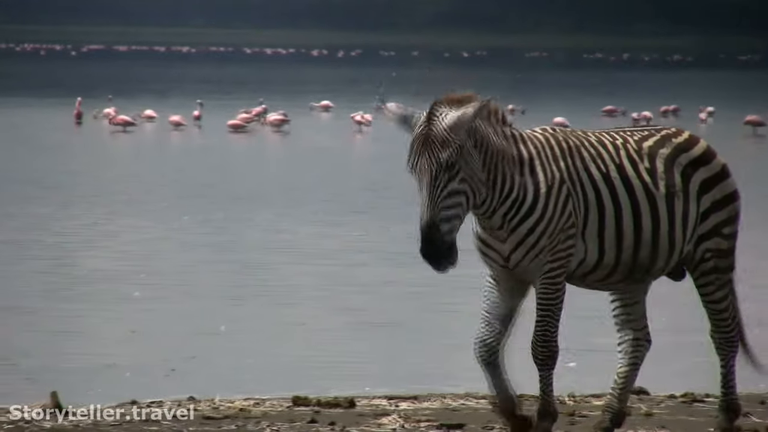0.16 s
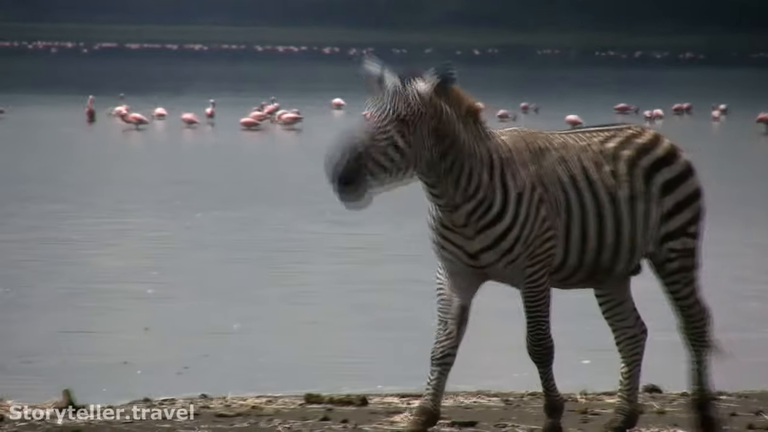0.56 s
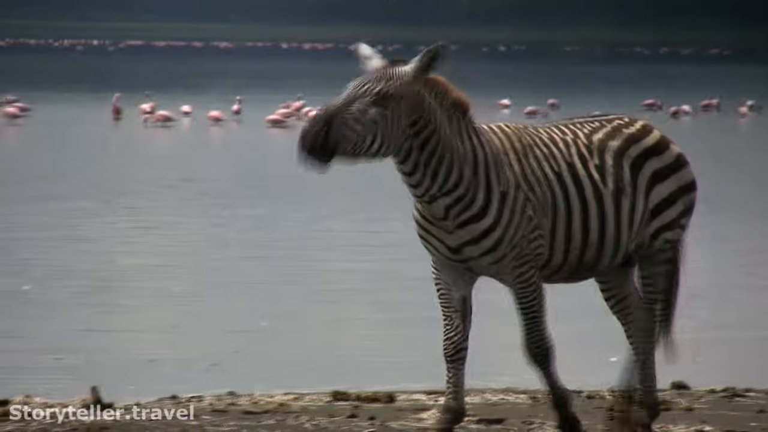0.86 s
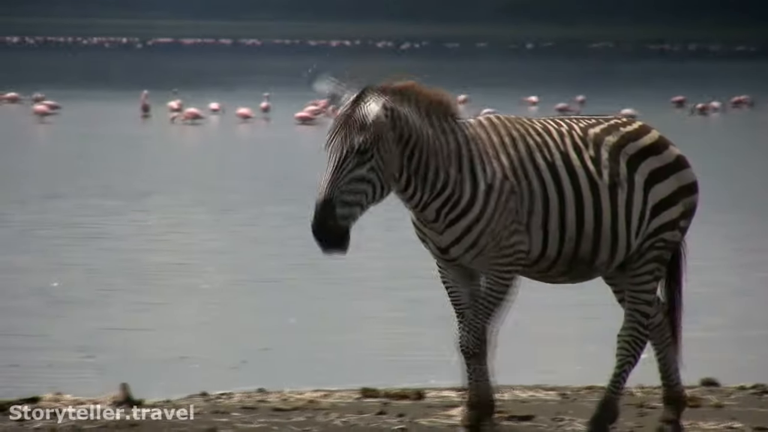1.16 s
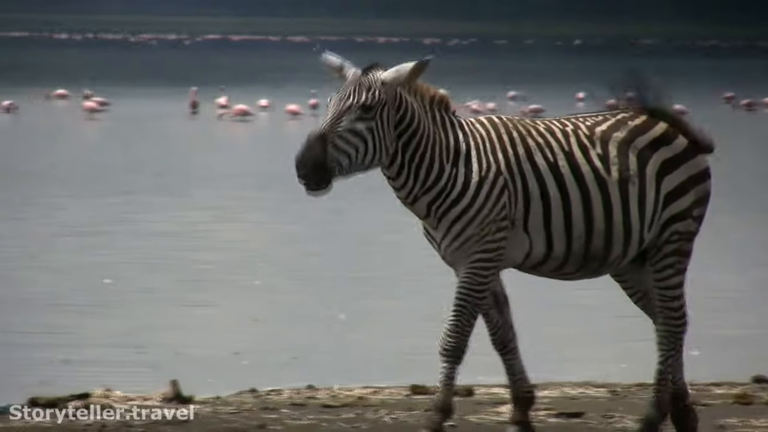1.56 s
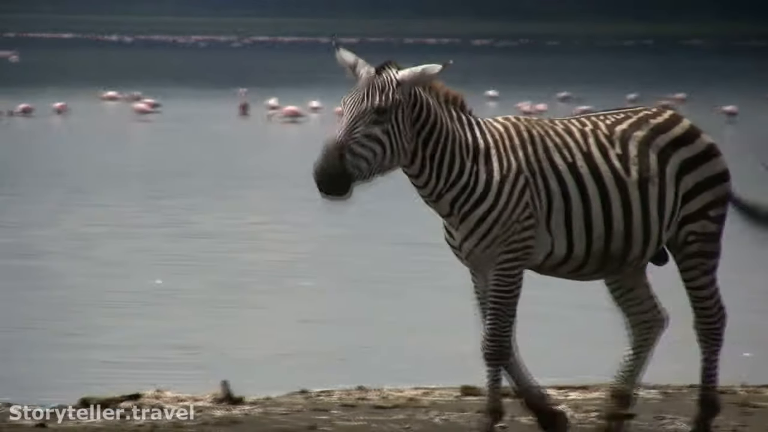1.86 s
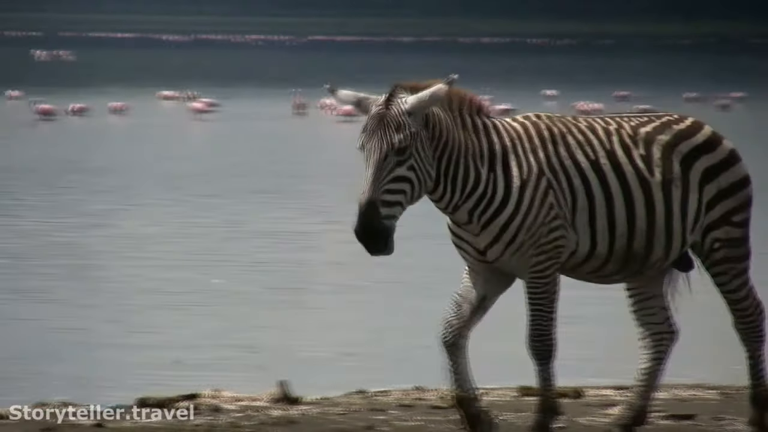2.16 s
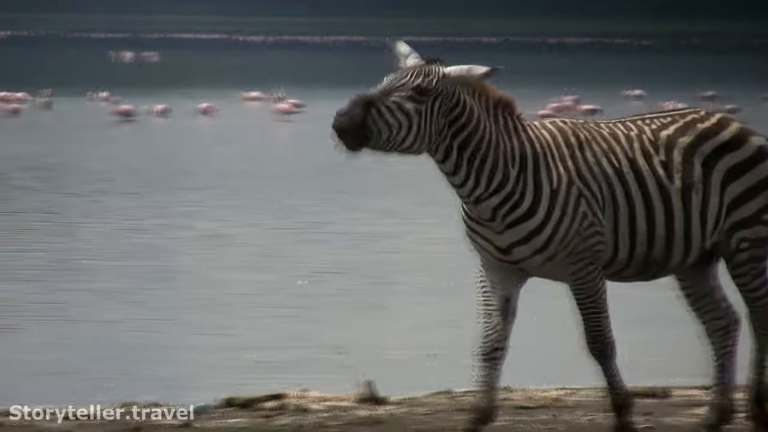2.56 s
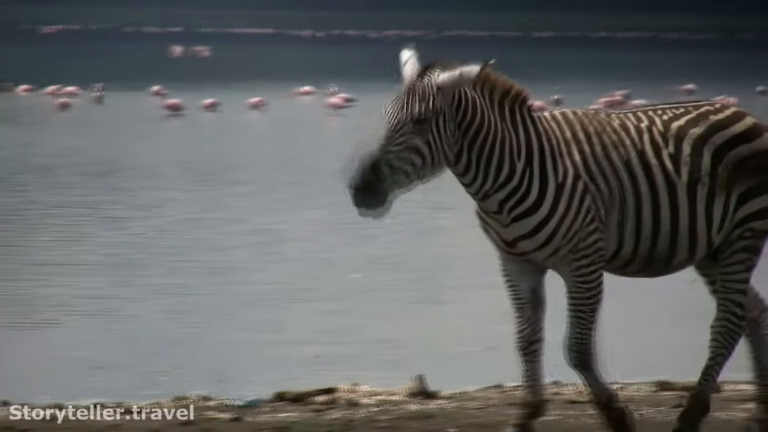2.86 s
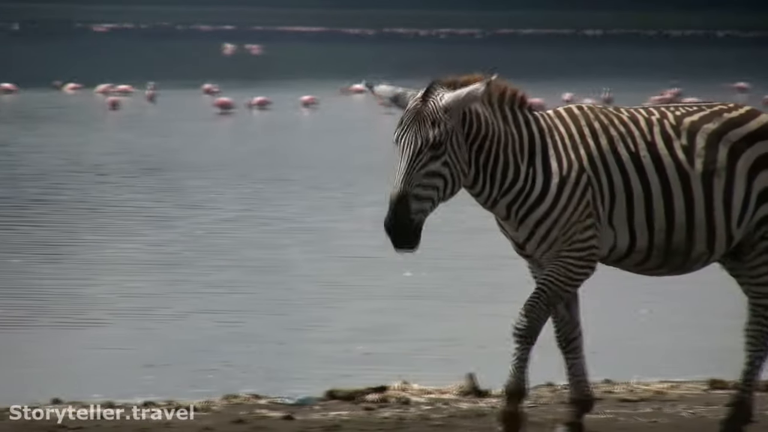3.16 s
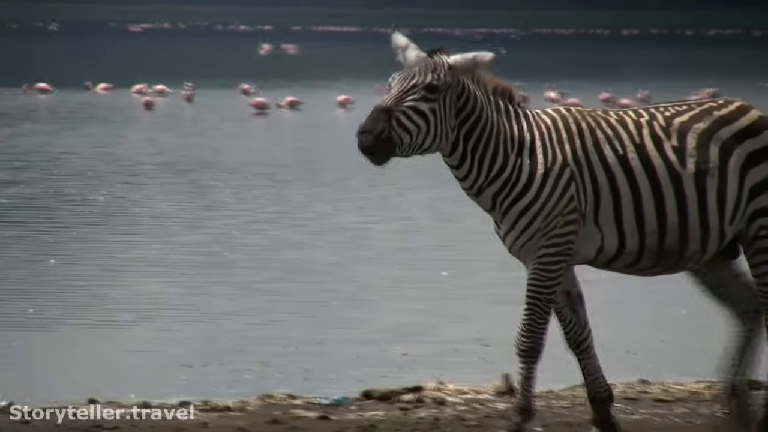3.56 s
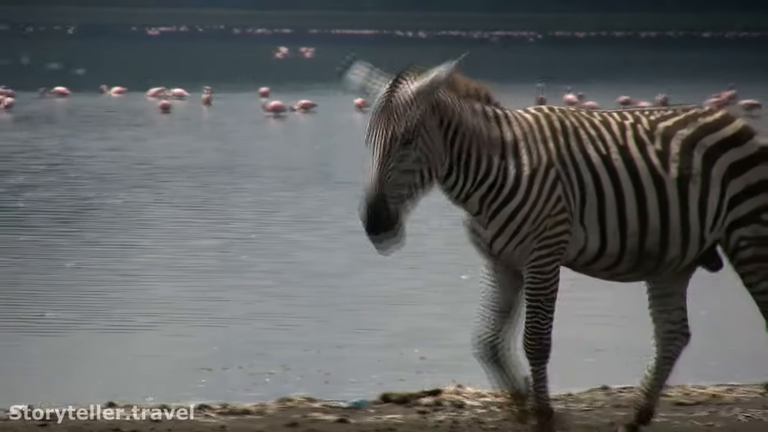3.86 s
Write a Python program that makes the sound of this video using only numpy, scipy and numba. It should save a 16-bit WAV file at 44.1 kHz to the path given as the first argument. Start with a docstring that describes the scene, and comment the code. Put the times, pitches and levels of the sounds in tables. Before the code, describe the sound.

Zebra yapping in short high whooping barks by a lake, low wind and faint bird chirps

```python
"""Wind rumble (wandering noise), a distant flock's murmur and hiss (flickering noise) run throughout.
A wheezy breath opens and more fill the pauses. From 0.1 s zebras yap on a lake shore: near-pure whoops that
climb, snap to a higher register and often slide down on the in-breath; delay lines echo them off the shore.
Short puffs of air join in; from 1 s a small bird gives four quick trills, swept tones.
A second, hoarser zebra joins at 3.6 s."""
import sys
import numpy as np
from scipy import signal
from scipy.fft import rfft, irfft
from scipy.io import wavfile
from scipy.ndimage import uniform_filter1d
from numba import njit

SR = 44100
rng = np.random.default_rng(int(sys.argv[2]) if len(sys.argv) > 2 else 0)


def persist_wave(psi):
    """Save psi, clipped to +-1, as 16-bit WAV."""
    counts = np.round(np.clip(psi, -1, 1) * 32767).astype(np.int16)
    wavfile.write(sys.argv[1], SR, np.atleast_2d(counts).T)


def volts_from_decibels(level):
    """Turn decibel levels (scalar or array-like) into linear amplitude factors."""
    exponent = np.asarray(level, float) / 20
    return 10 ** exponent


N = 176400


def curve(rows, col, t):
    """Column col of a table, joined by straight lines over the times t."""
    rows = np.array(rows, float)
    return np.interp(t, rows[:, 0], rows[:, col])


def walk(rate_hz, size=N):
    """Random levels held 1 / rate_hz and slewed twice; spread near 1."""
    hold = max(int(SR / rate_hz), 1)
    steps = np.repeat(rng.standard_normal(size // hold + 1), hold)
    slewed = uniform_filter1d(uniform_filter1d(steps, hold), hold)
    return 1.46 * slewed[:size]


def band(x, centre_hz, width_hz):
    """Resonance of the given centre and width."""
    return signal.lfilter(*signal.iirpeak(centre_hz, centre_hz / width_hz, SR), x)


def bands(spectrum, flicker_db, rate_hz):
    """Noise of the given colour in third octaves, each flickering on its own; rms 1."""
    hz, db = np.array(spectrum, float).T
    f = np.fft.rfftfreq(N, 1 / SR)[1:]
    colour = volts_from_decibels(np.interp(np.log(f), np.log(hz), db, -150, -150))
    whole = rfft(rng.standard_normal(N))[1:] * colour
    out = 0
    for centre_hz in hz[0] * 2 ** np.arange(0, np.log2(hz[-1] / hz[0]) + 1, 1 / 3):
        share = np.clip(1 - 3 * abs(np.log2(f / centre_hz)), 0, 1)
        out = out + irfft(np.r_[0, whole * share], N) * volts_from_decibels(flicker_db * walk(rate_hz))
    return out / np.std(out)


# breaths between the bouts: t/s, length/s, level/dB
WHEEZE_TIMES = [(0, 0.058, -56), (0.489, 0.23, -45), (1.414, 0.27, -48.5), (2.388, 0.29, -47.5),
                (3.241, 0.19, -46)]
# nostril noise colour, relative: f/Hz, level/dB per Hz
WHEEZE_COLOUR = [(210, -49.5), (350, -11.5), (633, -3), (727, -15), (875, 3), (1090, -17), (1550, -5),
                 (2010, -2.5), (2400, -9.5), (3200, -55.5), (4160, -100)]


def wheezes():
    """Air drawn through the nostrils: coloured noise, swelling and fading."""
    fade_s = 0.077
    t = np.arange(N) / SR
    swell = np.zeros(N)
    for start, length, db in WHEEZE_TIMES:
        swell += volts_from_decibels(db) * np.clip(np.minimum(t - start, start + length - t) / fade_s, 0, 1)
    return swell * bands(WHEEZE_COLOUR, flicker_db=4, rate_hz=28)


# rumble colour, relative: f/Hz, level/dB per Hz
WIND_COLOUR = [(15, -58), (40, -23), (67, -4), (119, -2.5), (205, -8), (249, -17), (325, -12), (385, -26),
               (450, -18.5), (580, -72.5)]
# gusts: t/s, level/dB
GUST_LEVEL = [(0, -47), (.18, -48.5), (.4, -45.5), (.6, -52.5), (.72, -46), (1.2, -46.5), (1.45, -51.5),
              (4, -57)]


def wind():
    """Wind rumble: low noise whose level follows the gusts."""
    gust_db = curve(GUST_LEVEL, 1, np.arange(N) / SR)
    return bands(WIND_COLOUR, flicker_db=3.5, rate_hz=14) * volts_from_decibels(gust_db)


# murmur colour, relative: f/Hz, level/dB per Hz
FLOCK_COLOUR = [(210, -29), (350, -10.5), (1010, -14), (1440, -11.5), (1630, -11.5), (1820, -17),
                (3200, -37.5), (4160, -63)]


def flock():
    """Distant flock: many voices blurred into flickering midrange noise."""
    return bands(FLOCK_COLOUR, flicker_db=3.5, rate_hz=25) * volts_from_decibels(-56)


# hiss colour, relative: f/Hz, level/dB per Hz
HISS_COLOUR = [(2000, -23), (3000, -2.5), (7500, -12), (8300, -12.5), (15500, -22), (16000, -59)]


def hiss():
    """Faint flickering treble noise."""
    return bands(HISS_COLOUR, flicker_db=2, rate_hz=38) * volts_from_decibels(-75)


# multiples 2-5: level/dB on the scale where the fundamental is +3, before throat, mouth and fade
OVERTONE_LEVELS = [-19.5, -22.5, -36.5, -45]
# throat resonances on the overtones: f/Hz, gain/dB
THROAT_GAIN = [(1200, -2.5), (1600, -1), (1850, -1), (2120, 8), (2350, -10), (2600, 4), (3000, -8.5),
               (3500, -10), (4200, -4), (5500, -25.5)]
# the head turns and the mouth opens: t/s, octave gain/dB, higher-overtone gain/dB
MOUTH_GAIN = [(.2, 2, -1), (.85, 4, 0), (1.81, 6, -2), (2.05, 3, -6), (2.79, 8, -6), (2.95, -4, -0.5),
              (3.75, -3, -1)]


def overtones(glide_hz, hz, t, patches, rasp):
    """Patchy overtones, shaped by throat and mouth, that fade in the upper register and on fast climbs."""
    snap_hz, pure_db_per_s, dull_db_per_multiple = 950, 71, 3.5
    glide_db_per_khz_s, free_khz_s = 2.5, 13
    step = np.arange(len(hz))
    last_low = np.maximum.accumulate(np.where(glide_hz < snap_hz, step, 0))
    upper_s = (step - last_low) / SR  # time since the snap
    climb_khz_s = np.gradient(glide_hz) * SR / 1000
    fade_db = pure_db_per_s * upper_s
    fade_db += glide_db_per_khz_s * np.maximum(climb_khz_s - free_khz_s, 0)
    phase = 2 * np.pi * np.cumsum(hz) / SR
    throat_hz, throat_db = np.array(THROAT_GAIN, float).T
    out = np.zeros(len(hz))
    for k, level_db in enumerate(OVERTONE_LEVELS, 2):
        db = level_db + np.interp(np.log(k * hz), np.log(throat_hz), throat_db)
        db += 3 * patches[k - 2]
        db += curve(MOUTH_GAIN, min(k - 1, 2), t)
        dull_db = dull_db_per_multiple * (k - 2) * (upper_s > 0)
        db -= uniform_filter1d(fade_db + dull_db, size=120)
        out += volts_from_decibels(db) * np.sin(k * phase) * (1 + 0.22 * rasp)
    return out


# breath colour, relative: f/Hz, level/dB per Hz
BREATH_COLOUR = [(200, -28.5), (500, -13), (850, 1), (2200, -4), (2700, -19.5), (6000, -50.5)]


def zebra(calls, rough):
    """A strong fundamental, overtones that break at the snap, rasp, throat breath and a ringing chest."""
    jitter, shimmer_db, edge_s = .011, 1.35, .005
    slack_hz, slack_rough = 560, .2  # low notes rattle more
    breath_db, breath_tilt, breath_lag_s = -23.5, .31, .02  # breath trails the voice
    t = np.arange(N) / SR
    out, blow = np.zeros(N), np.zeros(N)
    wobble, shimmer = walk(120), walk(90)
    rasp_filter = signal.butter(4, 350, fs=SR, output="sos")
    rasp = signal.sosfilt(rasp_filter, rng.standard_normal(N)) * 8
    patches = np.array([walk(70) for _ in OVERTONE_LEVELS])
    air = bands(BREATH_COLOUR, flicker_db=4, rate_hz=60)
    for rows in calls:
        start, end = rows[0][0], rows[-1][0]
        span = slice(int(start * SR), int(end * SR))
        now = t[span]
        glide_hz, db = curve(rows, 1, now), curve(rows, 2, now)
        hz = glide_hz * (1 + jitter * wobble[span])
        tone = np.sqrt(2) * np.sin(2 * np.pi * np.cumsum(hz) / SR)
        tone += overtones(glide_hz, hz, now, patches[:, span], rasp[span])
        slack = uniform_filter1d(1. * (hz < slack_hz), size=300)
        tone *= 1 + (rough + slack_rough * slack) * rasp[span]
        blow[span] += volts_from_decibels(db + breath_db - breath_tilt * (db + 25))
        ramp = np.clip(np.minimum(now - start, end - now) / edge_s, 0, 1)
        edge = np.sin(np.pi / 2 * ramp) ** 2
        out[span] += tone * edge * volts_from_decibels(db + shimmer_db * shimmer[span])
    follow = 1 / (breath_lag_s * SR)
    out += air * signal.lfilter([follow], [1, follow - 1], blow)
    chest = band(out, 851, 30)  # narrow: rings on after the voice has passed it
    return out + volts_from_decibels(-2.5) * chest


# each list is one unbroken stretch of calling: a yap, an in-breath slide, or several run together;
# most yaps cling near 870 Hz, then snap up: t/s, f/Hz, level/dB
YAP_CALLS = [
    [(.11, 498, -46.5), (.118, 570, -29.5), (.13, 743, -34.5), (.146, 829, -27), (.158, 850, -31.5),
     (.166, 1001, -33.5), (.19, 1097, -32.5), (.235, 1141, -34), (.26, 1130, -44.5)],
    [(.25, 896, -45.5), (.267, 508, -38), (.3, 518, -48.5), (.322, 417, -31)],
    [(.326, 459, -29), (.338, 623, -26.5), (.355, 775.4, -28.5), (.372, 856, -24), (.39, 860, -26.5),
     (.398, 1033, -31.5), (.42, 1117, -30), (.45, 1124, -27), (.48, 1146, -33), (.51, 1136, -44.5)],
    [(.786, 484, -25.5), (.795, 588.6, -27), (.81, 729, -19.5), (.826, 862, -20), (.836, 819, -19.5),
     (.844, 1017, -28.5), (.868, 1057, -19.5), (.887, 1119, -22), (.897, 1133, -37.5), (.93, 1134, -28),
     (.96, 1113, -48)],
    [(.933, 866, -39.5), (.946, 533, -28.5), (.96, 404, -32), (.985, 443, -36.5)],
    [(.997, 433, -48.5), (1.008, 469, -17.5), (1.02, 616, -24.5), (1.035, 756, -19.5), (1.05, 856, -18),
     (1.066, 861, -20), (1.074, 1045, -27.5), (1.11, 1099, -27), (1.125, 1118, -48), (1.142, 1128, -27.5),
     (1.19, 1146, -39.5)],
    [(1.254, 430, -40.5), (1.263, 488, -24), (1.277, 715, -30), (1.29, 811, -22.5), (1.305, 882, -21),
     (1.315, 849, -26), (1.323, 1088, -25.5), (1.365, 1128, -38), (1.38, 1140, -32.5), (1.435, 1166, -46)],
    [(1.749, 479, -36.5), (1.757, 563, -24), (1.77, 707.5, -29), (1.79, 838, -17.5), (1.8, 878, -31),
     (1.808, 996, -30.5), (1.83, 1070, -25), (1.86, 1132, -40), (1.878, 1133, -31), (1.895, 1136, -42.5)],
    [(1.888, 962.4, -43.5), (1.905, 622, -36.5), (1.92, 404.3, -30.5), (1.94, 420, -33.5),
     (1.966, 521.7, -22.5), (1.995, 788.3, -26.5), (2.012, 869.6, -19.5), (2.03, 869, -24),
     (2.038, 1060, -31), (2.07, 1114, -29.5), (2.103, 1096, -35.5), (2.119, 830, -21), (2.13, 690, -28.5),
     (2.147, 441, -30.5), (2.2, 402.7, -41), (2.222, 516, -23.5), (2.25, 813, -27), (2.267, 873, -24.5),
     (2.276, 1044, -26), (2.31, 1088, -28.5), (2.342, 1106, -40.5), (2.357, 1149, -29.5), (2.38, 1123, -51)],
    [(2.71, 586, -41.5), (2.722, 611.5, -21.5), (2.74, 760.4, -18), (2.754, 850, -24.5),
     (2.762, 973.6, -33.5), (2.79, 1044, -20.5), (2.806, 1029, -29.5), (2.82, 792, -12.5),
     (2.833, 658, -30), (2.85, 514, -22.5), (2.865, 613.5, -28), (2.878, 696, -19), (2.887, 781, -20.5),
     (2.9, 819, -13.5), (2.912, 814, -19.5), (2.918, 1065, -21), (2.94, 1117, -17.5), (2.975, 1164, -17.5),
     (3.005, 1180, -24), (3.025, 1198, -47.5)],
    [(3.015, 854, -40.5), (3.045, 452.6, -40.5), (3.068, 439.6, -43), (3.082, 500, -29), (3.094, 680, -22),
     (3.105, 762, -16.5), (3.12, 882, -18.5), (3.13, 900, -17.5), (3.137, 1079, -19.5), (3.15, 1131, -14.5),
     (3.18, 1184, -21), (3.21, 1224, -24.5), (3.245, 1210, -44)],
    [(3.466, 539, -29.5), (3.476, 652.5, -28), (3.49, 772, -16), (3.503, 859, -13), (3.51, 1022, -20),
     (3.535, 1139, -15.5), (3.565, 1143, -21.5), (3.595, 1163, -33.5), (3.62, 1133, -48)],
    [(3.662, 767, -21), (3.685, 730, -14.5), (3.698, 771.7, -15.5), (3.715, 922.4, -13.5),
     (3.723, 907, -19), (3.73, 1087, -21.5), (3.765, 1171, -17.5), (3.79, 1190, -45.5)],
    [(3.855, 751.4, -35.5), (3.866, 772, -14.5), (3.882, 795.6, -15), (3.889, 803, -28),
     (3.896, 967, -22.5), (3.925, 1042, -30), (3.945, 1007, -25), (3.955, 1054, -43.5), (3.97, 1084, -33),
     (3.99, 1027, -55)],
]
# the second, hoarser zebra: t/s, f/Hz, level/dB
HOARSE_CALLS = [
    [(3.63, 540.3, -38.5), (3.655, 839.3, -19), (3.667, 796.3, -24.5), (3.69, 857.3, -21.5),
     (3.73, 987, -17.5), (3.762, 659, -27.5), (3.778, 473.6, -28.5), (3.83, 483, -40.5)],
    [(3.833, 693, -44.5), (3.848, 820.3, -17.5), (3.857, 795.6, -28), (3.89, 803, -21), (3.94, 846, -46)],
    [(3.85, 241, -43), (3.865, 250, -41), (3.885, 373.4, -40), (3.925, 351, -39.5)],
]


def zebras():
    """Two callers; stronger rasp makes the second hoarser."""
    return zebra(YAP_CALLS, rough=0.07) + zebra(HOARSE_CALLS, rough=0.28)


@njit
def echoes(x, lags, gain, damp):
    """Eight delay lines that feed each other, duller on every round."""
    line, soft, out = np.zeros((8, 8192)), np.zeros(8), np.zeros(len(x))
    for i in range(len(x)):
        total = 0.
        for k in range(8):
            soft[k] += (1 - damp) * (gain[k] * line[k, (i - lags[k]) & 8191] - soft[k])
            total += soft[k]
        out[i] = soft[0] - soft[3] + soft[5] - soft[6]
        for k in range(8):
            line[k, i & 8191] = x[i] + soft[k] - total / 4
    return out


def shore(voices):
    """The shore's echo: a broad midrange band of the voices through the delay lines."""
    t60_s = 0.35  # before damping
    lags = np.array([1091, 1453, 1777, 2131, 2579, 2971, 3467, 4013])  # samples
    gain = volts_from_decibels(-60 * lags / SR / t60_s)
    sent = band(voices, 900, 980) + 1e-18  # offset keeps the loop out of denormals
    return volts_from_decibels(-14.5) * echoes(sent, lags, gain, 0.56)


# air from the nostrils and (the low one) from wind on the microphone: t/s, length/s, level/dB, f/Hz
PUFF_TIMES = [(2.97, .052, -42.5, 2750), (1.54, 0.027, -38, 760), (.21, 0.15, -40.5, 132)]


def puffs():
    """Short puffs of air: noise through three equal resonances."""
    t, out = np.arange(N) / SR, np.zeros(N)
    for start, length, db, hz in PUFF_TIMES:
        air = rng.standard_normal(N)
        for _ in range(3):
            air = band(air, hz, hz * .35)
        swell = np.clip(np.minimum(t - start, start + length - t) / 0.014, 0, 1)
        out += volts_from_decibels(db) * air / np.std(air) * swell
    return out


# bird trills: t/s, length/s, level/dB (before the bird's trim), first low point f/Hz, flutter/0-1
TRILL_TIMES = [(.9885, .03, -33, 3900, .8), (1.397, .032, -32, 3300, .25), (1.907, .024, -31, 3200, .2),
               (3.613, .034, -39, 4200, .6)]


def bird():
    """Each trill is a few V-shaped sweeps with climbing low points, loudest there, fluttering and smeared."""
    rate_hz, top_hz, climb_hz_per_s = 91, 7250, 105000
    swell_s, turn_db, octave_db = .010, 16, -29.5
    tail_s, tail_db, trim_db = .014, -11, -1
    out = np.zeros(N)
    t = np.arange(int(.12 * SR)) / SR
    for start, length, db, first_low_hz, flutter in TRILL_TIMES:
        dip = np.sin(np.pi * rate_hz * t) ** 2
        climb_hz = climb_hz_per_s * np.maximum(t - .5 / rate_hz, 0)
        low_hz = np.minimum(first_low_hz + climb_hz, top_hz)
        phase = 2 * np.pi * np.cumsum(top_hz - (top_hz - low_hz) * dip) / SR
        note = np.sin(phase) + volts_from_decibels(octave_db) * np.sin(2 * phase)
        note *= volts_from_decibels(turn_db * dip - turn_db)
        note *= np.clip(np.minimum(t / swell_s, (length - t) / .003), 0, 1)
        note *= 1 - flutter + flutter * walk(1500, size=len(t))
        leaves = rng.standard_normal(len(t)) * np.exp(-t / tail_s)
        leaves /= np.sqrt(np.sum(leaves ** 2))
        smear = signal.fftconvolve(note, leaves)[:len(t)]
        at = int(start * SR)
        out[at:at + len(t)] += volts_from_decibels(db + trim_db) * (note + volts_from_decibels(tail_db) * smear)
    return out


def scene():
    """Breaths, wind, flock and hiss; voices and puffs with their echo; bird."""
    backdrop = wheezes() + wind() + flock() + hiss()
    voices = zebras() + puffs()
    return (backdrop + voices + shore(voices) + bird())[None]


def top_cut(x):
    """Nothing passes above the cut-off."""
    return signal.sosfilt(signal.butter(12, 15700, fs=SR, output="sos"), x)


def record(dry):
    """A fast limiter holds the loudest yaps down."""
    limit_db = -10.5
    envelope = uniform_filter1d(abs(signal.hilbert(dry)), size=60)
    mix = dry / (1 + (envelope / volts_from_decibels(limit_db)) ** 6) ** (1 / 6)
    return top_cut(mix)


dry = scene()
out = record(dry)
persist_wave(out)
```